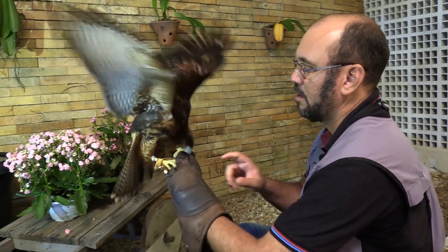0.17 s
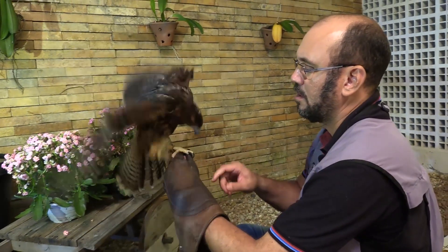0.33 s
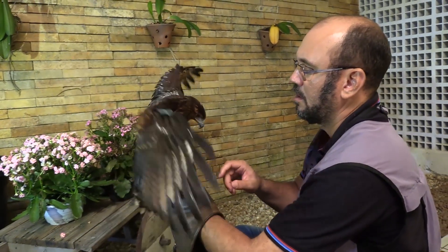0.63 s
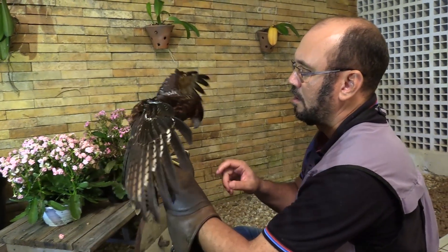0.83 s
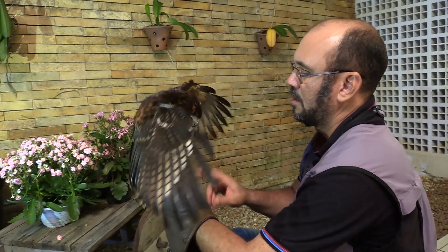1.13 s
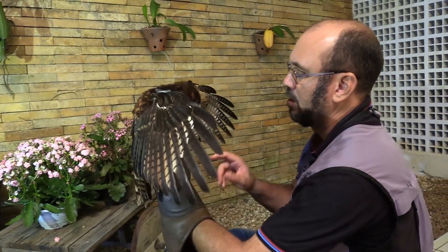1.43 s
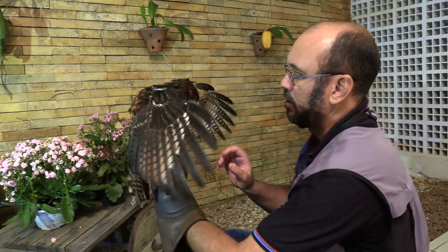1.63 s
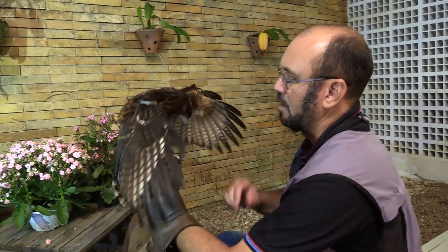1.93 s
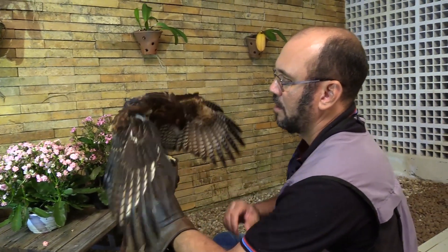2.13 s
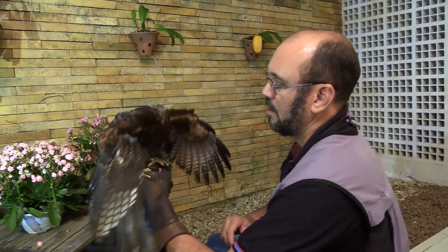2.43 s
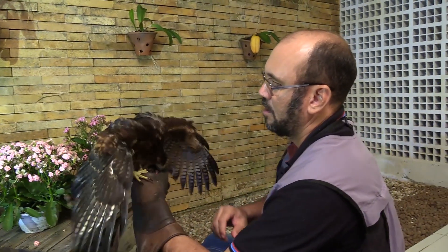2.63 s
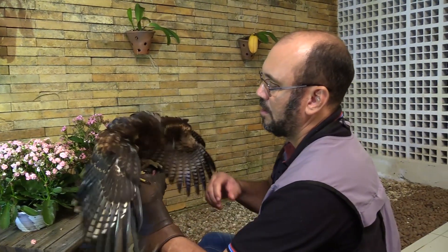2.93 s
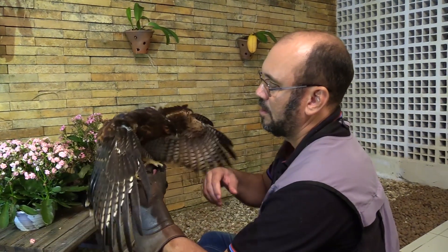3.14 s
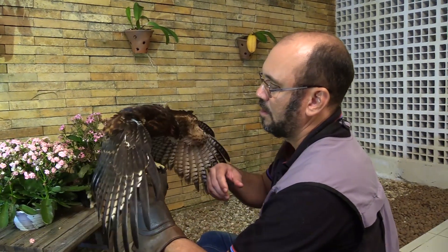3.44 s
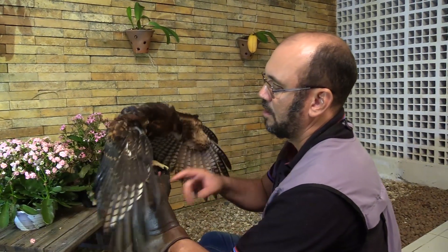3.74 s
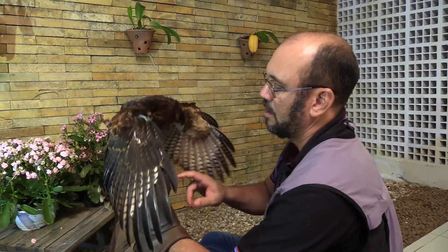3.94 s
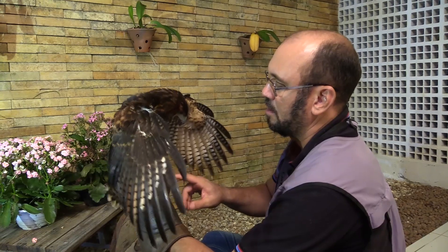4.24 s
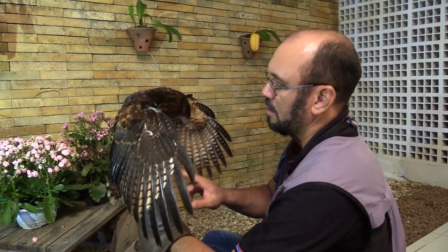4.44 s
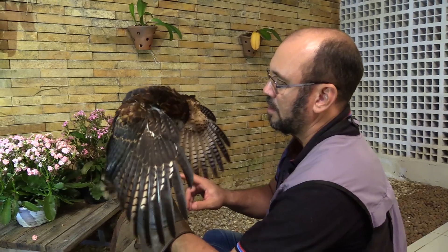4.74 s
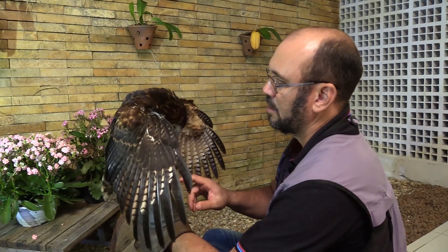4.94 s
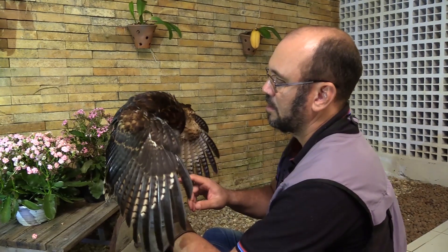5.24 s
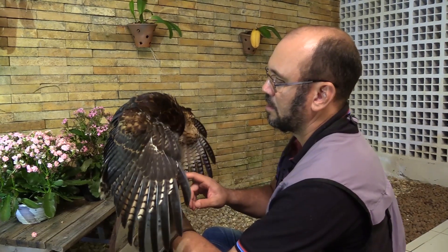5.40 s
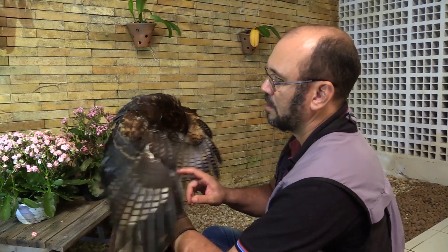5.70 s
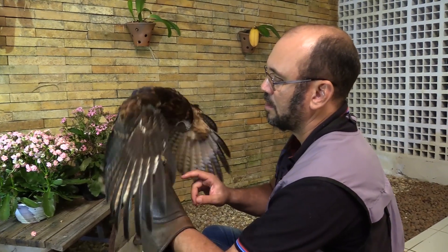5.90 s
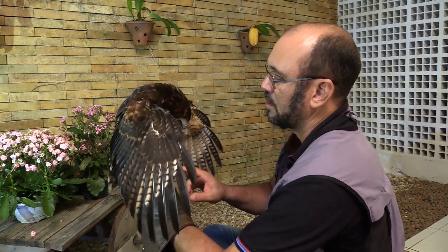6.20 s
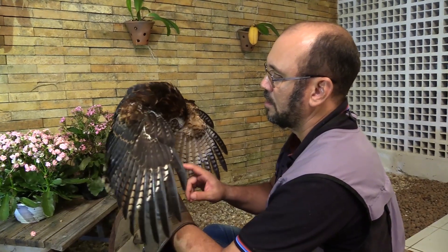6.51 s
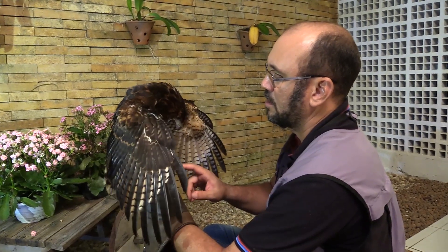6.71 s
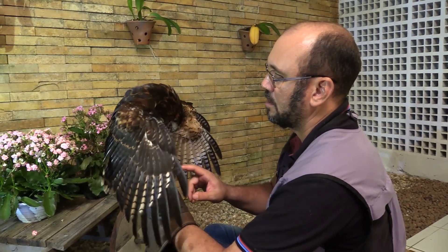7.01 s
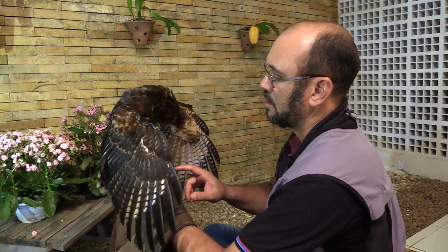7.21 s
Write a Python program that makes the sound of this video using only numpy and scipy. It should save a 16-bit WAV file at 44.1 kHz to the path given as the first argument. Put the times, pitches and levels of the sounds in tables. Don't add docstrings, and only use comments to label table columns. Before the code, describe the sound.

Outdoors in a brick-walled courtyard, a young hawk on a leather glove settles with faint wing rustle and small dry knocks. It starts with weak clicks and peeps, then bursts into loud, piercing chirps, about five a second, until the end. One longer squealing cry breaks the run early. Later two groups of dull hollow taps sound beneath. Close small microphone, slightly overloaded, short bright echo, distant traffic.

```python
import sys
import numpy as np
from scipy import signal
from scipy.fft import rfft, irfft, next_fast_len
from scipy.io import wavfile
from scipy.ndimage import uniform_filter1d, map_coordinates

SR = 44100
rng = np.random.default_rng(int(sys.argv[2]) if len(sys.argv) > 2 else 0)


def elevation(decibels):
    levels = np.asarray(decibels, float)
    return 10 ** (levels / 20)


def master(y):
    cut = np.clip(np.atleast_2d(y).T, -1, 1)
    pcm = np.round(cut * 32767)
    wavfile.write(sys.argv[1], SR, pcm.astype(np.int16))


N = 324576
MS = np.arange(SR // 12) * 1000 / SR
TOP_HZ = 15700

# [t/s, length/ms, top f/Hz, peak level/dB]
PIPS = [(.437, 6.7, 5100, -30.5), (0.725, 6.1, 5550, -19), (0.9816, 1.6, 5960, -26.5),
        (1.1688, 2.4, 5600, -26.5), (1.3431, 4.9, 5600, -12), (1.52, 5.3, 5870, -11.5),
        (1.698, 6.5, 5800, -12.5), (1.869, 7, 6250, -15), (2.0377, 3.8, 5740, -12),
        (2.218, 6.6, 5720, -10.5), (2.409, 5.7, 5400, -9.5), (2.583, 7.4, 6060, -15.5),
        (2.8708, 6.6, 5900, -17.5), (3.0453, 5.8, 6470, -12.5), (3.233, 6.5, 5800, -9.5),
            (3.421, 5.6, 5600, -12), (3.6077, 6.4, 5840, -11), (3.794, 4.6, 5930, -12.5),
            (3.997, 7, 6140, -12), (4.185, 6.3, 5940, -10), (4.38, 6.1, 5830, -10),
            (4.5816, 5.5, 5800, -9.5), (4.7782, 6.8, 5400, -10.5), (4.9696, 3.6, 5400, -7),
            (5.164, 6.3, 5600, -11.5), (5.3584, 6.3, 5360, -10.5), (5.554, 5, 5100, -10),
            (5.7479, 5.9, 5160, -9.5), (5.945, 7.2, 5330, -7), (6.1495, 6.1, 5270, -7),
            (6.3488, 7.5, 5400, -9.5), (6.5522, 8, 5430, -8.5), (6.7524, 5.5, 5230, -10),
            (7.006, 6.7, 6300, -18), (7.239, 5.8, 5300, -13)]
PIP_FLOOR_HZ, PIP_RISE_HZ_PER_MS = 3760, 393

# [t/s, break at/ms, crest f/Hz, break f/Hz, peak level/dB]
WHISTLES = [(.521, 11, 6100, 3520, -25.5), (.786, 33.7, 6280, 2880, -13.5),
            (1.035, 25.5, 6110, 3300, -14), (1.2158, 17.5, 6220, 3910, -11.5),
            (1.3948, 19.6, 7010, 4900, 1), (1.5695, 18.6, 7170, 5180, 1.5),
            (1.7475, 18.8, 7120, 5110, -1), (1.9191, 33, 6850, 3980, -2),
            (2.084, 20.6, 7180, 5140, -1.3), (2.269, 19.1, 7360, 5490, -4),
            (2.4562, 21, 7050, 5620, -0.2),
            (2.919, 16.2, 6950, 5200, -8), (3.09, 18.5, 6690, 4770, -1.1),
                (3.284, 18.8, 6950, 4940, -1), (3.4675, 17.8, 6900, 5040, -2.1),
                (3.658, 18.8, 6850, 5020, -0.9), (3.84, 18.3, 7030, 5180, -0.9),
                (4.046, 19.6, 7110, 5450, -1.5), (4.2312, 17.6, 7250, 5670, -2),
                (4.429, 20.3, 7370, 5600, -2.5), (4.6283, 18, 7090, 5500, -3), (4.826, 17, 7060, 5230, -4),
                (5.016, 17.8, 6910, 5330, -3.5), (5.2102, 17.6, 6660, 5290, -1.7),
                (5.408, 16.2, 6680, 5100, -5), (5.6024, 18.7, 6970, 5100, -7.5),
                (5.7938, 16.3, 7240, 6220, -4), (5.9942, 18, 7400, 5600, -5),
                (6.1962, 16.3, 7000, 5200, -3), (6.397, 17.2, 6700, 5140, -2.5),
                (6.6013, 16.5, 6750, 5170, -3), (6.8007, 18.3, 6630, 5070, -4), (7.064, 16, 6280, 4900, -4),
                (7.291, 18.1, 6110, 4930, -3.5)]
# [share of lower voice/0-1, crest level under peak/dB, octave level/dB,
# share of the fall left halfway/0-1, place of the peak/0-1]
WHISTLE_COLOUR = [(0.05, -9, -0.5, 0.47, 0.6), (0.4, -8, -2, 0.47, 0.37), (0.4, -16, -9, 0.54, 0.38),
                  (0.4, -7, -18, 0.52, 0.7), (0.43, -10, -29, 0.63, 0.93), (0.43, -8.5, -43, 0.8, 0.87),
                  (0.43, -6.5, -18, 0.65, 0.93), (0.4, -6.5, -19.5, 0.41, 0.55),
                  (0.43, -7.5, -17, 0.66, 0.95), (0.43, -5.5, -15, 0.55, 0.99),
                  (0.43, -9.5, -17, 0.65, 0.99), (0.43, -4.5, -8, 0.5, 0.87), (0.43, -6, -11, 0.5, 0.88),
                  (0.43, -6.5, -16, 0.6, 0.93), (0.43, -7.5, -13, 0.66, 0.92), (0.43, -9, -18, 0.6, 0.91),
                  (0.43, -6, -13, 0.72, 0.98), (0.43, -7, -15, 0.73, 0.9), (0.43, -4.5, -18, 0.72, 1),
                  (0.43, -6, -17, 0.8, 0.89), (0.43, -7, -20, 0.85, 0.77), (0.43, -5.5, -15, 0.93, 0.98),
                  (0.43, -9.5, -32, 0.72, 0.92), (0.43, -11.5, -37, 0.8, 0.94),
                  (0.43, -8.5, -34, 0.65, 0.85), (0.43, -7.5, -23, 0.8, 1), (0.2, -8, -8.5, 0.7, 0.64),
                  (0.3, -3.5, -11, 0.85, 0.97), (0.43, -7, -24, 0.69, 1), (0.43, -8, -23, 0.69, 0.95),
                  (0.43, -7.5, -25, 0.7, 0.85), (0.2, -8.5, -38, 0.76, 0.73), (0.12, -4, -11.5, 0.72, 0.63),
                  (0.43, -14, -25, 0.63, 1)]
LONG_MS = 26
CREST_MS, CREST_MS_PER_KHZ = 7.85, 2.68
CREST_MS_PER_DB = 0.28
FADE_HZ, FADE_DB_PER_KHZ, BREAK_DB = 5100, 18, -9

# [t/s, step down at/ms, end at/ms, shelf level/dB, low note level/dB]
STEPS = [(1.2325, 0.73, 4.7, -34.5, -30), (1.4126, 6.9, 16.5, -26.5, -25.5),
         (1.5869, 9.2, 20, -22.5, -28), (1.7663, 6.6, 16.7, -26.5, -24), (2.105, 7.4, 13.6, -25, -21),
         (2.289, 10.6, 19.5, -14.5, -23), (2.4735, 14.7, 27, -21, -20.5),
         (2.937, 4.1, 15.6, -29, -23.5), (3.108, 1.13, 12, -47, -24), (3.301, 7.3, 19, -23.5, -18),
             (3.484, 9.1, 19.3, -24.5, -17), (3.677, 5.1, 14.3, -20, -18), (3.858, 6.9, 18.3, -25, -18.5),
             (4.0645, 11.1, 20, -15.5, -15.5), (4.247, 13.7, 23.2, -18.5, -16.5),
             (4.4482, 15.4, 24.7, -15.5, -14), (4.6458, 14, 25, -17.5, -16.5),
             (4.843, 10.2, 21.3, -16, -18.5), (5.0324, 14.2, 23.7, -17, -19),
             (5.228, 10, 22.2, -18.5, -18.5), (5.4245, 4.6, 19.7, -17, -23.5),
             (5.622, 11.6, 21.3, -12.5, -16.5), (5.81, 23, 34.2, -17.5, -16),
             (6.0113, 18, 27.1, -15.5, -14), (6.213, 13.2, 25, -22, -15.5), (6.4144, 7.2, 18.6, -23.5, -19),
             (6.619, 8.7, 19.7, -17, -18), (6.8196, 5.4, 19.3, -15.5, -16.5), (7.081, 1.8, 13.6, -16, -19),
             (7.3077, 2.8, 13, -24, -19)]
# [shelf f/Hz, shelf overtone level/dB, low-note octave level/dB,
# low-note twelfth level/dB, place of the octave's peak/0-1]
STEP_COLOUR = [(3800, -11, -27, -8, 0.4), (3810, -13, -27, -20, 0.4), (3830, -12, -24, -19, 0.4),
               (3700, -9, -14, -16, 0.4), (3790, -12, 4, -22, 0.4), (4120, -12, 6, -11, 0.3),
               (4150, -12, 4, -7, 0), (3830, -3, -2, -4, 0.3), (3700, -12, -1, -12, 0),
               (3570, -3, 0.5, -11, 0.4), (3790, -12, 7.5, -11, 0.5), (3720, -7, 3.5, -10, 0.4),
               (3780, -2, 6.5, -11, 0.6), (4160, -11, 5, -5.5, 0.1), (3940, -10, 9, -2, 0.14),
               (4190, -11, 10, -9.5, 0.53), (4180, -13, 6.5, -7.5, 0.3), (4070, -10, 11.5, -7, 0.94),
               (4136, -9, 12, -7, 0.54), (3950, -23, 13, -9, 0.87), (3710, -7, 2.5, -16, 0.5),
               (4020, -14, 8.5, -9, 1), (3980, -8.5, 8.5, -10.5, 0.66), (4100, -9, 12.5, -9, 0.84),
               (3900, -8, 12.5, -7, 0.9), (3800, -0.5, 10.5, -7, 0.6), (3770, -14, 12, -7, 0.5),
               (3800, -26, 11, -8, 0.4), (3900, -4, 2.5, -2, 0.4), (3950, -17, 6.5, -5, 0.5)]
SHELF_GROWS_DB_PER_MS = 0.7

# [t/s, strain/0-1, lowest mode f/Hz, closing croak level/dB]
STRAIN = [(1.23, 0.1, 2190, -33), (1.4, 0, 2500, -63), (2.1, 0.2, 2650, -56), (2.5, 0.3, 2360, -37.5),
          (2.95, 1, 2375, -38.5), (3.7, 0.53, 2670, -49), (4.25, 0.37, 2496, -52), (4.45, 0.8, 2573, -26.5),
          (5, 0.7, 2653, -40), (5.8, 0.97, 2580, -30.5), (6.4, 0.72, 2542, -37.5), (6.8, 1, 2536, -28.5),
          (7.1, 1, 2434, -26.5)]
STRAIN_BREAK_DB = 7.5
# [start t/s, rows of (t/ms, f/Hz, level/dB, overtone level/dB, air level/dB)]
CRIES = [
    (2.6275, [(0, 5400, -28, 14, 2), (5.1, 6400, -16.5, 6, -13), (12, 6260, -3.5, -5, -42), (19.6, 5800, -6.5, -3.5, -39), (38.9, 5570, -16.5, -24, -23), (53, 4560, -20.5, 1, -28), (56.6, 4700, -23, -10, -14), (63.1, 6100, -19.5, -10, -3), (67.4, 6000, -50, -12, -6)]),
    (2.63, [(0, 6300, -35, -25, -21), (2, 5700, -10, -25, -25), (6, 7600, -12.5, -26, -22), (8.5, 6000, -11, -25, -30), (10, 6300, -45, -24, -21)]),
    (2.664, [(0, 8400, -40, -30, -9.5), (1.5, 8350, -17, -31, -11), (11, 7100, -47, -31, -10)]),
    (2.713, [(0, 3700, -36, -4, 7), (4, 4800, -30, 0, 1), (6.5, 4650, -21.5, -10, -12), (12, 5150, -17, -10, -16), (14, 6000, -43, -7, -11)]),
    (2.7233, [(0, 4800, -30, -25, -9), (2, 6500, -14.5, -25, -8), (4, 6600, -26, -28, -8), (11, 6700, -27, -30, -13), (14, 5900, -15, -30, -28), (17, 4500, -20, -30, -22), (18.5, 790, -34, -30, -3)]),
    (2.727, [(0, 5900, -42, -30, -20), (1.5, 6150, -27, -30, -18), (8, 5400, -26, -30, -18), (10, 5900, -48, -30, -21)]),
    (2.742, [(0, 4900, -28, -15, -16), (2.5, 4000, -23, -12, -22), (8, 3850, -27.5, -15, -25), (14, 3350, -22, -28, -28), (15.5, 3100, -40, -28, -28), (19, 2400, -27, -28, -28), (22, 2900, -43, -28, -30)]),
]
# [f/Hz, width/Hz, level/dB]
BEAK = [(8100, 1440, 0.5), (11330, 2000, -2.5), (14300, 1100, -2.5)]

# [t/s, peak level/dB]
TAPS = [
    (4.632, -13),
    (4.792, -10.5),
    (4.966, -9.5),
    (5.813, -14.5),
    (5.979, -9),
    (6.147, -6.5),
    (6.318, -13.5),
    (6.493, -11.5),
]
# [f/Hz, width/Hz, level/dB]
TAP_BODY = [(396, 94, -0.5), (857, 284, 2), (1240, 273, 2.5), (1625, 680, -10), (7900, 5800, -15)]
# [delay t/ms, level/dB]
TAP_ECHOES = [(11, -7), (19, -23)]
TICK_S, TICK_DB = 0.583, -25

# [t/s, length/ms, centre f/Hz, level/dB]
STROKES = [
    (0.062, 75, 2600, -53),
    (.204, 70, 8300, -52),
    (0.306, 94, 6800, -61),
]
# [t/s, peak level/dB, ring f/Hz, t60/ms]
KNOCKS = [
    (.161, -38, 756, 15),
    (0.229, -42, 1300, 15),
    (.341, -41, 920, 220),
    (.549, -36, 710, 54),
    (.671, -37, 520, 39),
    (0.741, -30, 1000, 10),
]
# [t/s, rustle level/dB, leather creak level/dB]
FEATHERS = [
    (.05, -58.5, -54),
    (.19, -59.5, -54),
    (0.371, -62, -59),
    (.6, -60.5, -48),
    (.8, -61.5, -55),
]
# [f/Hz, level per Hz/dB]
RUSTLE = [(1500, -38), (2500, -4), (8000, -4), (13000, -18)]

# [f/Hz, t60/s, level/dB]
YARD = [(2970, 0.4, 3.5), (3280, 0.38, 7.5), (4050, 0.41, -4.5), (5400, 0.43, -7.5), (7950, 0.35, -0.5),
        (11300, 0.29, -2)]
# [f/Hz, level per Hz/dB]
TOWN = [(15, -11), (32, -13), (75, -15), (169, -2.5), (359, -15), (919, -26.5), (1410, -18), (2560, -21),
        (3530, -42), (9050, -31), (15500, -38.5)]
# [f/Hz, width/Hz, level/dB]
DRONE = [(58.2, 5.7, -58.5), (160.8, 56, -53.5), (258.4, 13, -57.5), (790, 96, -82), (1109, 87, -63.5),
         (1297, 53, -63.5)]


def hawk():
    pip, pip_air = pips()
    whistle, whistle_air, clicks = whistles()
    step, step_air = steps()
    long, long_air = cry()
    throat = modes([(5600, 1800, 5.5), (7660, 1800, 7.5), (12100, 1600, -1.0), (14900, 8200, -9)])
    hiss = unit(filtered(rng.standard_normal(N), throat))
    thud = filtered(clicks[:N], modes([(530, 340, 8.9)]))
    tones = (pip + whistle + step + long)[:N]
    breath = (whistle_air + step_air + long_air)[:N] * hiss
    puffs = pip_air[:N] * uniform_filter1d(hiss, size=2)
    return tones + breath + puffs + elevation(1.5) * thud


def pips():
    out, air = np.zeros((2, N + SR))
    for s, length, to_hz, db in PIPS:
        from_hz = max(PIP_FLOOR_HZ, to_hz - PIP_RISE_HZ_PER_MS * length)
        s, length = s - .001, length + 2
        hz = line([0, 1.5, length - 2.2], [0.914 * from_hz, from_hz, to_hz], 0.92)
        phase = turns(hz, 0.011)
        swell = elevation(db) * line([0, 0.19 * length, 0.5 * length, length - 1.5, length],
                               [0.005, 0.2, 0.94, 0.19, 0.0049], 0.67)
        early = elevation(db) * line([0, 1, .5 * length, 0.7 * length], [0.26, 0.45, 0.67, 0], 0.97)
        puff = elevation(db) * line([0, .5 * length, length - 2, length + 3], [0.02, 0.71, 0.89, 0.01], .5)
        tone = swell * elevation(2.6 * wobble(584, len(MS))) * np.sin(phase) * (MS < length)
        octave = early * elevation(5.8 * strain(s) - 14) * overtone(2, hz, phase)
        add(out, s, tone + octave)
        add(air, s, elevation(-15) * puff)
    return out, air


def whistles():
    out, air, clicks = np.zeros((3, N + SR))
    rows = WHISTLES
    for (s, end, crest_hz, end_hz, peak_db), (second, under_db, octave_db, mid, place) in zip(rows, WHISTLE_COLOUR):
        long = end > LONG_MS
        crest = CREST_MS + CREST_MS_PER_KHZ * (crest_hz / 1000 - 7)
        crest = max(crest + (0 if long else CREST_MS_PER_DB * peak_db), 3.5)
        mid_hz = end_hz + mid * (crest_hz - end_hz)
        peak, crest_db = place * end, peak_db + under_db
        end_db = peak_db + BREAK_DB + STRAIN_BREAK_DB * strain(s)
        end_db = end_db - FADE_DB_PER_KHZ * max(FADE_HZ - end_hz, 0) / 1000

        upper_hz = arch(crest, end, crest_hz, mid_hz, end_hz)
        lower_hz = line([0, 1.5, 0.593 * crest, crest + 3, crest + 8],
                        [0.778 * crest_hz, .74 * crest_hz, .78 * crest_hz, .87 * crest_hz, 0.9 * mid_hz], 3.5)
        upper, lower = turns(upper_hz, 0.0065), turns(lower_hz, 0.02)

        swell = line([0, .3, crest, peak, end - .8, end - .1, end + .5],
                     [0, 0.35 * elevation(crest_db), elevation(crest_db), elevation(peak_db), elevation(end_db), 0.94 * elevation(end_db), 0], 0.18)
        lead = line([0, .5 * crest, 0.89 * crest, crest + 6], [0, .05, .9, 1], 0.79)
        rival = line([0, 0.33 * crest, crest, crest + 4, crest + 6, crest + 11],
                     [1, 1, second, 1.05 * second, 0.2 * second, 0.05], 0.5)

        sidebands = 0.44 * lead * rival * np.sin(2 * upper - lower)
        octaves = elevation(octave_db) * lead ** 2 * overtone(2, upper_hz, upper)
        octaves = octaves + elevation(-6.0) * rival * overtone(1.942, lower_hz, lower)
        octaves = octaves + elevation(-10.5) * lead * rival * np.sin(upper + lower)
        octaves = octaves + elevation(octave_db - 17) * lead * overtone(3, upper_hz, upper)
        flicker = 0.71 + (.15 if long else .55) * wobble(1860, len(MS))
        add(out, s, swell * (lead * np.sin(upper) + rival * np.sin(lower) + sidebands + octaves * flicker))

        onset_puff = elevation(crest_db - 19) * line([0, .3, 2.5, 5], [0, 1, .5, 0], .2)
        add(air, s, swell * (elevation(-21) * rival + elevation(-32)) + onset_puff)
        add(clicks, s + end / 1000, [elevation(end_db)])
    return out, air, clicks


def steps():
    out, air = np.zeros((2, N + SR))
    rows = STEPS
    for (s, down, end, early_db, low_db), (shelf_hz, over_db, octave_db, twelfth_db, place) in zip(rows, STEP_COLOUR):
        final_hz, croak_db = strain(s, column=2), strain(s, column=3)
        late_db = early_db + SHELF_GROWS_DB_PER_MS * (min(down, 16) - 11)
        shelf_start_hz = (1.02 - 0.0118 * max(down - 12, 0)) * shelf_hz
        hz = line([0, 0.15 * down, .5 * down, down - .4, down + 0.9, end - 1, end + 5],
                  [4550, shelf_start_hz, shelf_hz, .96 * shelf_hz, 1.143 * final_hz, final_hz, 0.65 * final_hz], 0.99)
        phase = turns(hz, .013)

        early, low = elevation(early_db), elevation(low_db)
        swell = line([0, .5, 0.33 * down, 0.15 * down, 1.004 * down, down + 0.091, (down + end) / 2, end - 1.5, end + 1],
                     [0, .5 * early, 0.53 * early, 0.98 * early, elevation(late_db), 0.56 * low, low, 0.7 * low, 0], 0.14)
        octave_peak = down + 0.81 + place * (end - down - 2.7)
        octave = elevation(low_db + octave_db) * line([0, down - .5, down + 0.76, octave_peak, end - 1.8, end - .2],
                                                [0.027, 0.008, 0.48, 1, 0.38, 0.038], 0.41)

        on_shelf = line([0, down - .5, down + .5], [1, 1, 0], .6)
        shelf_tones = overtone(1.98, hz, phase) + elevation(-12.0) * overtone(3, hz, phase)
        low_tones = overtone(2.996, hz, phase) + elevation(-9) * overtone(4, hz, phase)
        upper = on_shelf * elevation(over_db) * shelf_tones + (1 - on_shelf) * elevation(twelfth_db) * low_tones

        croak = elevation(croak_db) * line([0, end - 6, end - 1, end + 3, end + 5], [0.076, 0.082, 0.89, 0.81, 0.018], 0.57)
        croak = croak * (np.sin(phase / 3) + .5 * np.sin(2 * phase / 3))
        swell = swell * elevation(3.2 * wobble(450, len(MS)))
        add(out, s, swell * (np.sin(phase) + upper) + octave * np.sin(2 * phase) * (MS < end) + croak)
        add(air, s, elevation(-27) * (swell + octave * (MS < end)))
    return out, air


def cry():
    out, air = np.zeros((2, N + SR))
    for s, rows in CRIES:
        ms, hz, db, over_db, air_db = np.transpose(rows)
        hz, swell = line(ms, hz, 1.1), elevation(line(ms, db, .8)) * (MS < ms[-1])
        phase = turns(hz, 0.0033)
        upper = overtone(1.954, hz, phase) + elevation(-9) * overtone(3, hz, phase)
        add(out, s, swell * (np.sin(phase) + elevation(line(ms, over_db, .8)) * upper))
        add(air, s, swell * elevation(line(ms, air_db, .8)))
    return out, air


def arch(crest, end, crest_hz, mid_hz, end_hz):
    span, long = end - crest, end > LONG_MS
    early_hz = mid_hz + (.33 if long else .62) * (crest_hz - mid_hz)
    late_hz = mid_hz - (.4 if long else .55) * (mid_hz - end_hz)
    ms = [0, 0.7 * crest, crest, crest + 0.208 * span, crest + .5 * span, crest + 0.712 * span, end - 1, end + 1]
    hz = [.8 * crest_hz, .95 * crest_hz, crest_hz, early_hz, mid_hz, late_hz, end_hz, 0.87 * end_hz]
    return line(ms, hz, 1.9)


def overtone(multiple, hz, phase):
    return np.abs(modes(BEAK)(multiple * hz)) * np.sin(multiple * phase) * (multiple * hz < TOP_HZ)


def strain(s, column=1):
    return np.interp(s, *np.transpose(STRAIN)[[0, column]])


def turns(hz, jitter):
    return 2 * np.pi * np.cumsum(hz * (1 + jitter * wobble(800, len(hz)))) / SR


def taps():
    blows = np.zeros(N + SR)
    for s, db in TAPS:
        echoes = sum(elevation(echo_db - 14) * np.exp(-((MS - ms) / 0.61) ** 2) for ms, echo_db in TAP_ECHOES)
        smear = elevation(-17.0 - 60 * MS / 70) + echoes
        burst = smear * unit(uniform_filter1d(rng.standard_normal(len(MS)), size=2)) * .5
        burst[:5] += signal.windows.hann(7)[1:-1] / 3
        add(blows, s + 0.00166, elevation(db + 23.0) * burst)
    return filtered(blows[:N], modes(TAP_BODY))


def talon():
    out = np.zeros(N + SR)
    add(out, TICK_S, elevation(TICK_DB - 60 * MS / 4) * rng.standard_normal(len(MS)))
    return filtered(out[:N], modes([(800, 900, 6), (9000, 5000, -5)]))


def strokes():
    out = np.zeros(N + SR)
    for s, length, hz, db in STROKES:
        band = lambda f: modes([(hz, .45 * hz, 0)])(f) ** 2
        noise = unit(filtered(rng.standard_normal(N), band))[-len(MS):]
        swell = line([0, 1.5, .7 * length, length], [0, 0.93, .6, 0], .8)
        add(out, s, elevation(db + 3.5 * wobble(81, len(MS))) * swell * noise)
    for s, db, hz, t60 in KNOCKS:
        decay = elevation(db - 60 * MS / t60 + 3.9 * wobble(150, len(MS)))
        add(out, s, decay * np.sin(turns(hz + 0 * MS, .12)))
    return out[:N]


def feathers():
    s, rustle_db, creak_db = np.transpose(FEATHERS)
    rustle = unit(filtered(rng.standard_normal(N), lambda hz: elevation(along(RUSTLE, hz))))
    creak = unit(filtered(rng.standard_normal(N), lambda hz: modes([(800, 900, 0)])(hz) ** 2))
    level = lambda db, lumps_db: elevation(np.interp(np.arange(N) / SR, s, db) + lumps_db * wobble(45, N))
    return level(rustle_db, 3.1) * rustle + level(creak_db, 3.4) * creak


def yard(x):
    hz, t, z = signal.stft(rng.standard_normal((2, SR // 2)), SR, nperseg=256)
    decay = elevation(along(YARD, hz, column=2)[:, None] - 60 * t / along(YARD, hz)[:, None])
    shape = decay * (1 - np.exp(-t / 0.01)) * (1 + 1.1 * np.exp(-t / 0.024))
    tails = signal.istft(z * shape, SR, nperseg=256)[1]
    turn = 2.4 * wobble(30, N)
    delay = round(.003 * SR)
    parts = np.pad(x * np.array([np.cos(turn), np.sin(turn)]), ((0, 0), (delay, 0)))
    return signal.fftconvolve(parts, tails / np.linalg.norm(tails[0]), axes=1).sum(0)[:N]


def town():
    z = signal.stft(rng.standard_normal(N + 512), nperseg=512)[2]
    field = uniform_filter1d(uniform_filter1d(rng.standard_normal(z.shape), 5, 0), 10, 1)
    patchy = signal.istft(z * elevation(2.2 * unit(field)), nperseg=512)[1][:N]
    wash = elevation(-50.5) * unit(filtered(patchy, lambda hz: elevation(along(TOWN, hz))))
    hum = lambda hz, width: unit(filtered(rng.standard_normal(N), lambda f: modes([(hz, width, 0)])(f) ** 2))
    return wash + sum(elevation(db + 2 * wobble(3, N)) * hum(hz, width) for hz, width, db in DRONE)


def unit(x):
    return x / np.sqrt(np.mean(x ** 2) + 1e-20)


def along(points, hz, column=1):
    f, v = np.transpose(points)[[0, column]]
    return np.interp(np.log(hz + 1), np.log(f + 1), v)


def line(ms, values, soften):
    joined = np.interp(MS, np.maximum.accumulate(ms) + np.arange(len(ms)) / 1000, values)
    return uniform_filter1d(joined, max(round(soften * SR / 1000), 1), mode="nearest")


def wobble(rate, count):
    return map_coordinates(rng.standard_normal(int(count * rate / SR) + 4), [np.arange(count) * rate / SR])


def filtered(x, response):
    m = next_fast_len(N + SR // 2)
    return irfft(rfft(x, m) * response(np.fft.rfftfreq(m, 1 / SR)), m)[..., :N]


def modes(table):
    return lambda f: sum((-1) ** k * elevation(db) * 1j * f * w / (c * c - f * f + 1j * f * w)
                         for k, (c, w, db) in enumerate(table))


def add(track, s, sound):
    track[round(s * SR):][:len(sound)] += sound


def scene():
    near = hawk() + taps() + talon()
    return (near + elevation(-20.5) * yard(near) + feathers() + strokes() + town())[None]


def roll_off(x):
    return signal.sosfilt(signal.butter(12, 21500, fs=SR, output="sos"), x)


def record(dry):
    limited = filtered(dry, lambda hz: np.where(hz < TOP_HZ, 1, elevation(-53)))
    clipped = limited / (1 + np.abs(limited) ** 60) ** (1 / 60)
    return roll_off(clipped)


dry = scene()
out = record(dry)
master(out)
```